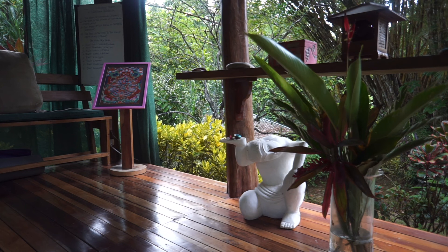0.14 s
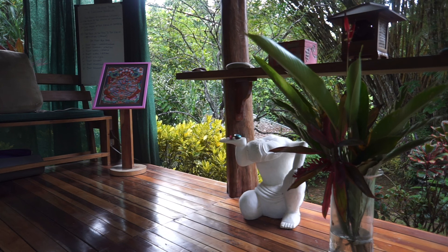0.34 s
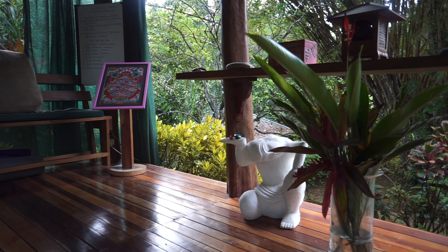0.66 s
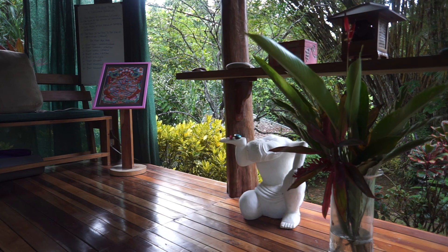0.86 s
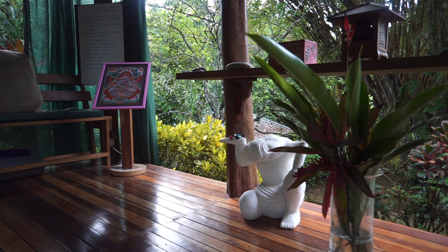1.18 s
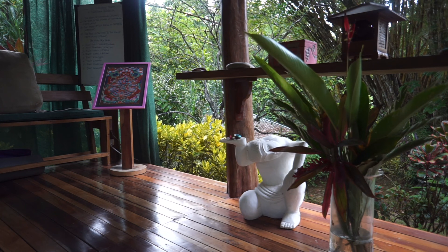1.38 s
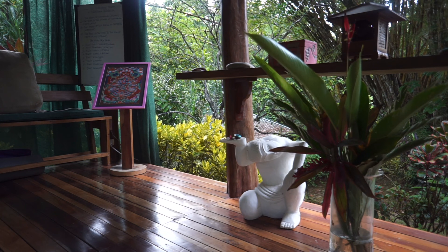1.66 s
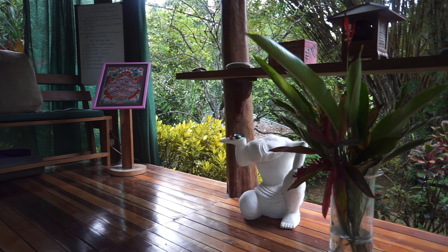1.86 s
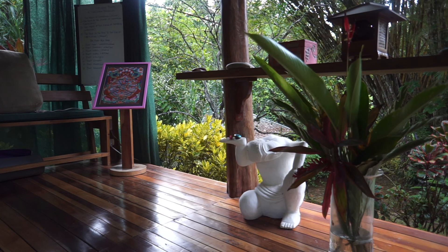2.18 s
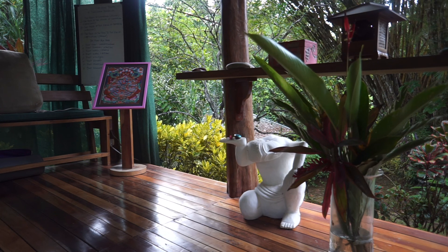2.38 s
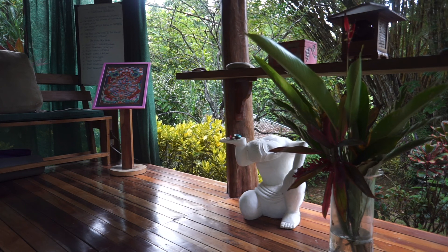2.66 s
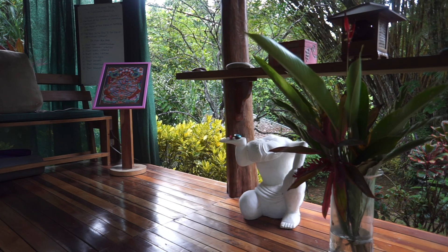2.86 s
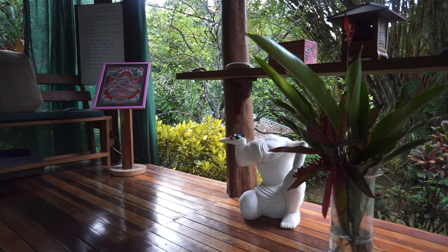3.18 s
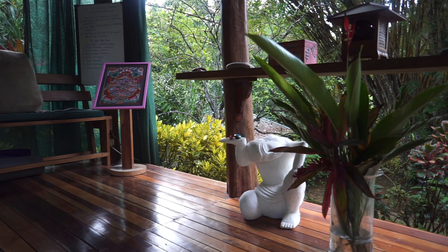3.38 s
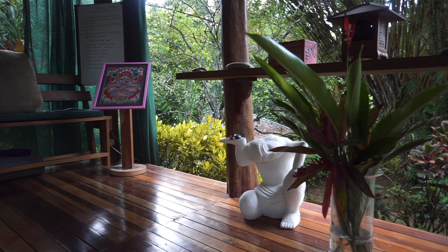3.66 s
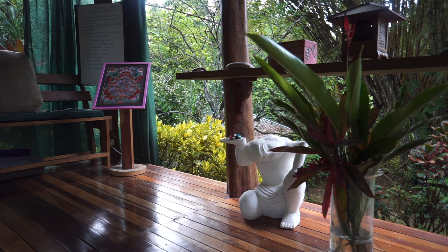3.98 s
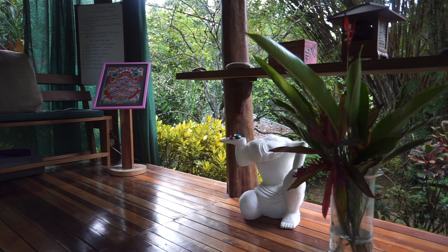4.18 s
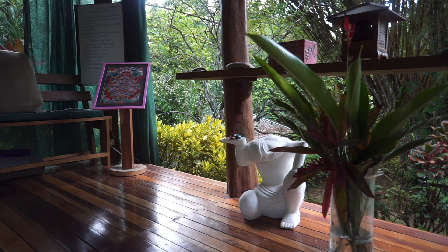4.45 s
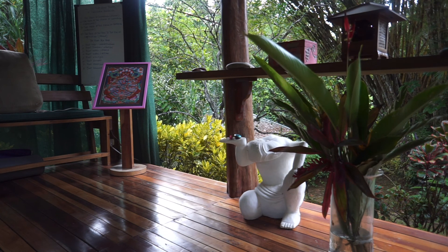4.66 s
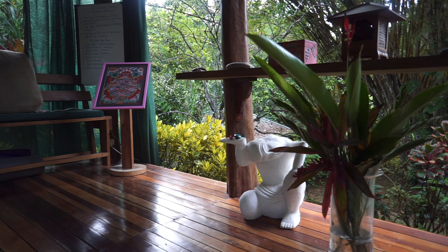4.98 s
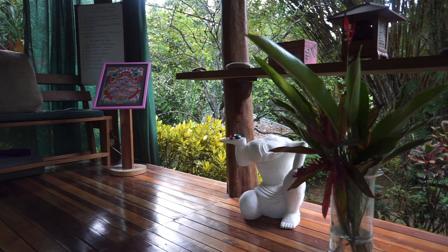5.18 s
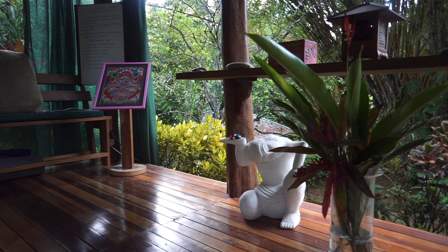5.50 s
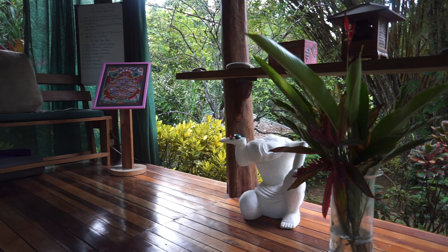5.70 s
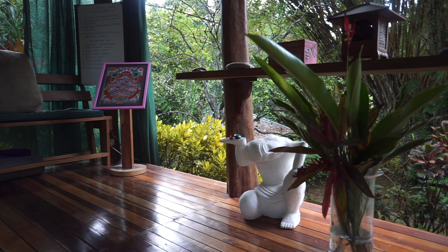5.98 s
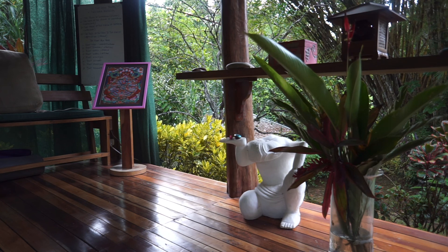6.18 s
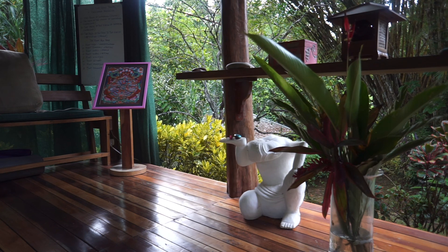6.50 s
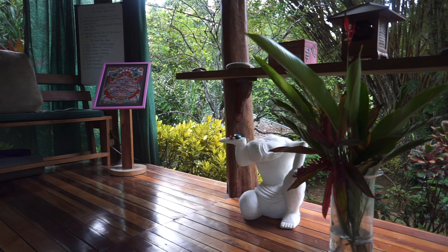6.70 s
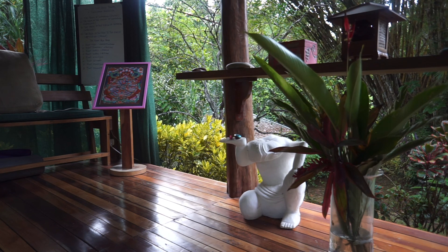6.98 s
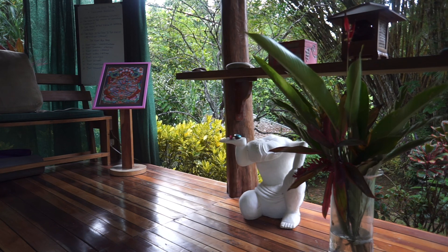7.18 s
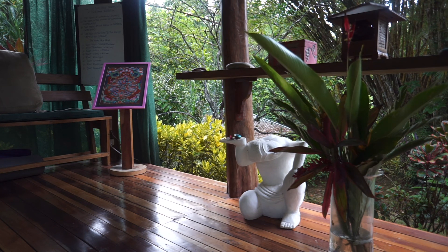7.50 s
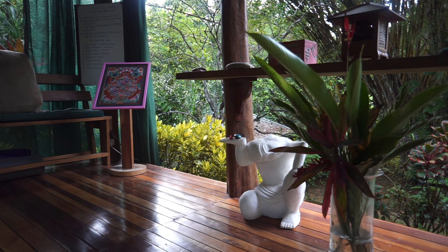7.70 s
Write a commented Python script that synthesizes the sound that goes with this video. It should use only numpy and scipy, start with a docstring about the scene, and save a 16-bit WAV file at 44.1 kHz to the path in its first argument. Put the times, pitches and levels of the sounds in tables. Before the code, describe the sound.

On a quiet jungle veranda, a frog croaks rapidly, wood thumps, then loud rising bird whistles ring among trees over throbbing crickets and faint hum.

```python
"""A quiet veranda at the edge of a tropical forest, over far forest noise, a faint hum and throbbing crickets.
A frog croaks in step at first, over faint chirps; a slower insect joins in with even buzzes of narrow noise.
Small knocks lead to a hollow wooden thump, a struck set of ringing modes; then a bird's gliding sines echo
among the trees. Midway come low rasps, hoarse grunts and squawks, all shaped noise, and puffs of wind.
Clicks and rustles are scattered throughout; late on, wind and rustles mix with the last whistles."""
import sys
import numpy as np
from scipy import signal
from scipy.fft import rfft, irfft
from scipy.io import wavfile

SR = 44100
rng = np.random.default_rng(int(sys.argv[2]) if len(sys.argv) > 2 else 0)


def convert_level_to_amplitude(level_db):
    """Map a level in decibels to its linear amplitude factor."""
    exponent = np.asarray(level_db, float) / 20
    return 10 ** exponent


def wrap_up_sound(samples):
    """Save the sound to the file named by the first command line argument, as 16-bit audio."""
    columns = np.atleast_2d(samples).T
    # keep every value between -1 and 1, then stretch to whole-number steps
    tamed = np.clip(columns, -1, 1)
    steps = np.round(tamed * 32767).astype(np.int16)
    wavfile.write(sys.argv[1], SR, steps)


N = 345734
LEFT_LAG = 4   # samples by which the left port hears later


def rms_one(x):
    """Scale to rms 1."""
    return x / np.sqrt(np.mean(x ** 2) + 1e-20)


def in_time(rows):
    """Columns of a curve table at every sample."""
    s, *columns = np.transpose(rows)
    return [np.interp(np.arange(N) / SR, s, c) for c in columns]


def at_hz(points, hz):
    """Read a spectrum on a log-frequency axis."""
    table_hz, values = np.transpose(points)
    return np.interp(np.log(hz + 1), np.log(table_hz + 1), values)


def drift(rate_hz):
    """Slow random curve of rms 1: low-passed noise, drawn once every 40 samples."""
    r = np.exp(-80 * np.pi * rate_hz / SR)
    noise = rng.standard_normal(N // 40 + 2002)
    slow = signal.lfilter([1], [1, -2 * r, r * r], noise)[2000:]   # skip the filter's start
    return np.interp(np.arange(N) / 40, np.arange(len(slow)), rms_one(slow))


def resonate(x, hz, width_hz):
    """One resonance, gain 1 on top."""
    r = np.exp(-np.pi * width_hz / SR)
    feedback = [1, -2 * r * np.cos(2 * np.pi * hz / SR), r * r]
    return signal.lfilter(np.array([1, 0, -1]) * (1 - r * r) / 2, feedback, x)


def lean(pan_db):
    """Left and right gains that differ by pan_db."""
    return convert_level_to_amplitude(np.array([[pan_db / 2], [-pan_db / 2]]))


def place(x, pan_db):
    """A source reaches the left port a little late."""
    return np.array([np.roll(x, LEFT_LAG), x]) * lean(pan_db)


def trees(x, direct_db, t60, near_db, near_t60, alike):
    """Scatter from near trunks dies fast, from the far forest slowly; partly alike at both ports."""
    t = np.arange(SR) / SR
    shape = convert_level_to_amplitude(-60 * t / t60) + convert_level_to_amplitude(near_db - 60 * t / near_t60)
    both, left, right = rng.standard_normal((3, SR)) * rms_one(shape) / np.sqrt(SR)
    alike = np.clip(alike, 0, 1)
    echo = np.sqrt(alike) * place(both, 0) + np.sqrt(1 - alike) * np.array([left, right])
    scattered = signal.fftconvolve(x[None], echo, axes=1)[:, :N]
    return convert_level_to_amplitude(direct_db) * place(x, -0.19) + scattered


def puffs(rows, apart=0.99):
    """Bursts of coloured noise: (peak_s, level_db, rise_s, t60_s, centre_hz, width_hz, pan_db)."""
    out, t = np.zeros((2, N)), np.arange(SR) / SR
    for s, db, rise, t60, hz, width_hz, pan_db in rows:
        noise = rng.standard_normal((3, SR))
        for _ in range(2):
            noise = resonate(noise, hz, 1.2 * width_hz)
        noise = rms_one(noise)
        swell, fall = np.exp(-2 * (t / rise - 2) ** 2), convert_level_to_amplitude(-60 * (t - 2 * rise) / t60)
        shape = np.where(t < 2 * rise, swell, fall)
        # one noise shared by both ports, and one of its own in each
        burst = convert_level_to_amplitude(db) * shape * (place(noise[0], pan_db) + apart * noise[1:])
        start = int((s - 2 * rise) * SR)
        out[:, start:start + SR] += burst[:, :N - start]
    return out


CUTS = [(3.522, -11.5), (6.073, -1.5)]


def bird():
    """Pure whistles with a slight waver and soft edges; the bird is hidden, so scattered sound outweighs direct."""
    attack_s, release_s = 0.017, 0.0072
    # pitch wobble as a share; notes softer than steady_db wobble more
    wobble, steady_db, wobble_per_db = .0022, -42, .0009
    t, parts = np.arange(N) / SR, np.zeros((len(CUTS) + 1, N + SR))
    waver, flutter = np.resize(drift(30), N + SR), convert_level_to_amplitude(3.02 * drift(91))
    for s, hz, db in notes():
        start = int(s * SR)
        on, age = slice(start, start + len(hz)), np.arange(len(hz)) / SR
        edge = np.clip(np.minimum(age / attack_s, age[::-1] / release_s), 0, 1)
        depth = wobble + wobble_per_db * max(steady_db - db.max(), 0)
        phase = 2 * np.pi * np.cumsum(hz * (1 + depth * waver[on])) / SR
        part = sum(s > cut_s for cut_s, _ in CUTS)
        parts[part, on] += np.sqrt(2) * edge * convert_level_to_amplitude(db) * np.sin(phase)
    heard = [trees(p[:N] * flutter, direct_db=-9, t60=1.0, near_db=3, near_t60=.2, alike=0.64)
             for p in parts]
    # each cut lowers the notes begun since the cut before it, with their echo; later notes are untouched
    for part, (cut_s, remaining_db) in zip(heard, CUTS):
        part *= np.clip((cut_s - t) / 0.0025, convert_level_to_amplitude(remaining_db), 1)
    return sum(heard)


# rising whistles, a straight glide: start_s, rise_s, from_hz, top_hz, level_db (at the best pitch)
GLIDES = [(0.10, 0.26, 2480, 3050, -59), (1.86, 0.097, 2390, 2760, -53.5), (2.065, .09, 1900, 2700, -37),
          (2.224, .08, 2000, 2690, -38), (2.615, .13, 1900, 2950, -38), (2.799, .095, 2196, 2960, -36.5),
          (3.19, 0.16, 2120, 3030, -35.5), (3.38, .095, 2280, 3050, -34), (3.523, .10, 2060, 2750, -35),
          (3.925, 0.15, 1982, 2960, -39), (4.126, .095, 2250, 2950, -34), (4.53, 0.14, 2120, 3020, -35),
          (4.725, 0.099, 2275, 3020, -34), (5.129, .135, 2190, 2990, -36), (5.33, .09, 2370, 3000, -34)]
# held whistles that slide into their pitch: start_s, length_s, from_hz, held_hz, level_db, fade_db
HOLDS = [(1.61, .13, 2000, 2480, -42, 10), (2.925, .26, 1980, 2415, -37, 20),
         (3.685, .14, 2040, 2250, -36, 14), (4.29, .19, 2200, 2520, -35.5, 25),
         (4.915, .12, 2380, 2320, -39, 22), (5.495, 0.19, 2300, 2490, -36.5, 17),
         (5.695, .378, 2200, 2670, -35, 3), (6.075, .075, 2470, 2490, -33, 15),
         (7.2, .19, 1950, 2390, -41, 12), (7.53, .19, 1850, 2090, -40.5, -2),
         (7.71, .13, 2100, 2490, -43, 0.1)]
# short level chirps from further off: start_s, length_s, pitch_hz, level_db
CHIRPS = [(0.01, 0.059, 2150, -53), (1.11, .06, 3800, -64), (1.215, .05, 2320, -52.5),
          (1.27, .05, 3730, -60), (1.315, .045, 2310, -51.5), (1.385, .08, 2770, -55),
          (1.785, .05, 2120, -47), (7.02, .05, 3850, -55)]


def notes():
    """Every whistle as (start s, pitch Hz, level dB), one value a sample."""
    top_s, top_sag_hz, top_fade_db = .04, 60, 11   # a short stay on top of a glide, sagging and dying
    scoop_hz_per_s, scoop_power = 4800, 2.1   # mean speed of the slide; how it rounds into the held pitch
    sag_hz_per_s2 = 1700   # the held pitch then falls ever faster
    chirp_fade_db = 6
    for s, rise, from_hz, top_hz, db in GLIDES:
        t = span(rise + top_s)
        up, top = np.minimum(t / rise, 1), np.maximum(t - rise, 0) / top_s
        hz = from_hz + (top_hz - from_hz) * up - top_sag_hz * top
        yield s, hz, db + carry_db(hz) - top_fade_db * top
    for s, length, from_hz, held_hz, db, fade_db in HOLDS:
        t, rise = span(length), abs(held_hz - from_hz) / scoop_hz_per_s + 1 / SR
        scoop = (held_hz - from_hz) * np.maximum(1 - t / rise, 0) ** scoop_power
        hz = held_hz - scoop - sag_hz_per_s2 * np.maximum(t - rise, 0) ** 2
        yield s, hz, db + carry_db(hz) - fade_db * (t / length) ** 2
    for s, length, hz, db in CHIRPS:
        t = span(length)
        yield s, hz + 0 * t, db - chirp_fade_db * (t / length) ** 2


def span(length):
    """Time axis of a note in seconds."""
    return np.arange(int(length * SR)) / SR


def carry_db(hz):
    """The whistle carries best at one pitch and thins out below and above it."""
    full_hz, low_loss_db_per_khz, high_loss_db_per_khz = 2530, 28, 2.5
    loss = np.maximum(low_loss_db_per_khz * (full_hz - hz), high_loss_db_per_khz * (hz - full_hz))
    return -loss / 1000


# blow on hollow wood and its bounces: start_s, strength_db, contact_hz (lower is softer)
THUMPS = [(1.058, -28, 1140), (1.076, -31, 640), (1.105, -27, 570), (1.154, -42, 740)]
# ringing modes of the wood: pitch_hz, level_db, t60_s
WOOD = [(142, -20, .5), (177.5, -1, 0.62), (199.5, -7, 0.4), (246, -1, 0.25), (270, -7.5, 0.33),
        (306.3, -9.5, 0.33), (450, -19, 0.22), (504, -16.5, 0.15), (730, -8, 0.03), (1200, -23, 0.077)]


def thumps():
    """Soft blows, low-passed clicks, ring the modes of hollow wood; air carries none of the slow push."""
    blows = np.full(N, 1e-18)
    for s, db, contact_hz in THUMPS:
        touch = signal.windows.hann(int(SR / contact_hz))
        blows[int(s * SR):][:len(touch)] = convert_level_to_amplitude(db) * touch / touch.sum()
    # neighbouring modes ring in opposite phase
    body = sum((-1) ** k * convert_level_to_amplitude(db) * ring(blows, hz, t60) for k, (hz, db, t60) in enumerate(WOOD))
    body = signal.sosfilt(signal.butter(2, 90, "high", fs=SR, output="sos"), body)
    echo = trees(body, direct_db=-60, t60=.35, near_db=0, near_t60=.2, alike=.5)
    return place(body, .3) + convert_level_to_amplitude(-16) * echo


def ring(clicks, hz, t60):
    """A unit click sets a decaying sine of height 1 ringing."""
    r, w = convert_level_to_amplitude(-60 / (t60 * SR)), 2 * np.pi * hz / SR
    return signal.lfilter([0, np.sin(w)], [1, -2 * r * np.cos(w), r * r], clicks)


# throat of the frog: centre_hz, width_hz, first_croak_db, last_croak_db, t60_s
FROG = [(1180, 220, -4, -4, .1), (2120, 160, -1, -13, 0.12)]


def frog():
    """Each far croak is a short rough burst in both throat resonances."""
    count, first_s, gap_s, gap_growth_s = 19, .124, .1163, .00042
    level_db, spread_db = -50, 1
    k = np.arange(count)
    times = first_s + gap_s * k + gap_growth_s * k ** 2 / 2
    levels = level_db + spread_db * rng.standard_normal(count)
    rows = []
    for s, db, late in zip(times, levels, k / k[-1]):
        for hz, width, first_db, last_db, t60 in FROG:
            tone_db = first_db + late * (last_db - first_db)
            rows.append((s + .006, db + tone_db, .004, t60, hz, width, 0))
    return puffs(rows, apart=0.6)


# harsh squawks: peak_s, level_db, fall_t60_s
SQUAWKS = [(4.045, -53, .84), (4.09, -50.5, 0.2), (6.084, -54, 0.03), (6.116, -49.5, .5)]
# their throat resonances: centre_hz, width_hz, level_db
THROAT = [(1850, 510, -2.5), (2700, 530, 8), (3050, 97, 0), (3630, 470, 3), (3850, 48, -4),
          (4630, 780, -3.5), (5600, 900, -9.5)]


def squawks():
    """A rough breathy source fills every throat resonance at once."""
    rise_s = .019
    rows = [(s, db + top_db, rise_s, t60, hz, width, 0)
            for s, db, t60 in SQUAWKS for hz, width, top_db in THROAT]
    return puffs(rows) * convert_level_to_amplitude(1.7 * drift(27))


def strikes(rows):
    """Noise bursts that start at once: (start_s, peak_db, centre_hz, width_hz, t60_s)."""
    # noise peaks stand above its mean level, hence 7 dB less
    return puffs([(s + 0.00082, db - 7.0, .0005, t60, hz, width, 0) for s, db, hz, width, t60 in rows])


# small knocks: start_s, peak_db, centre_hz, width_hz, t60_s
KNOCKS = [(0.5703, -38, 3030, 1960, .24), (0.919, -37.5, 2560, 500, 0.11), (4.657, -40.5, 626, 580, 0.2),
          (5.25, -42, 786, 774, 0.19)]


def knocks():
    """Small knocks: instant bursts of band noise that die in a fraction of a second."""
    return strikes(KNOCKS)


# dry clicks in the treble: start_s, peak_db, centre_hz
CLICKS = [(0.293, -38, 7900), (2.9163, -40, 8900), (3.557, -43, 8000), (4.715, -44, 10000),
          (7.1706, -47, 8900)]


def clicks():
    """Dry clicks: instant bursts of wide treble noise, gone within hundredths of a second."""
    width_hz, t60_s = 3600, .03
    return strikes([(s, db, hz, width_hz, t60_s) for s, db, hz in CLICKS])


def grainy(rows):
    """Noise bursts that swell and fade, their level fluttering inside."""
    return puffs(rows) * convert_level_to_amplitude(0.96 * drift(90))


# leafy rustles: peak_s, level_db, rise_s, centre_hz, width_hz
RUSTLES = [(1.301, -59, .06, 4500, 3000), (2.9, -56, .1, 1300, 800), (7.14, -52.5, .035, 2400, 2500),
           (7.43, -54.5, 0.027, 2170, 2400)]


def rustles():
    """Leafy rustles: wide grainy noise that swells and fades, its fall t60 16 times the rise."""
    return grainy([(s, db, rise, 16 * rise, hz, width, 0) for s, db, rise, hz, width in RUSTLES])


# low rasps: peak_s, level_db, t60_s
RASPS = [(3.834, -49, 0.37), (3.889, -47.5, 0.3)]
# their resonances: centre_hz, width_hz, level_db
RASP_BANDS = [(225, 40, -1.1), (612, 123, -1.5)]


def rasps():
    """Low rasps: grainy noise in low resonances."""
    rise_s = .02
    return grainy([(s, db + top_db, rise_s, t60, hz, width, 0)
                   for s, db, t60 in RASPS for hz, width, top_db in RASP_BANDS])


# short hoarse grunts: peak_s, level_db, brightness_db_per_octave
GRUNTS = [(4.025, -54.5, -7), (4.449, -59.5, 2), (5.642, -53, -1.5), (6.256, -53.5, -0.5)]
# their resonances: centre_hz, width_hz, level_db
GRUNT_BANDS = [(1060, 300, -1), (1570, 560, -0.5), (3400, 2600, 2.5)]


def grunts():
    """Hoarse grunts: grainy noise in wide resonances, tilted brighter or darker each time."""
    rise_s, t60_s = .028, 0.3
    rows = []
    for s, db, tilt_db in GRUNTS:
        for hz, width, top_db in GRUNT_BANDS:
            octaves = np.log2(hz / GRUNT_BANDS[0][0])
            rows.append((s, db + top_db + tilt_db * octaves, rise_s, t60_s, hz, width, 0))
    return grainy(rows)


# bands of the crickets: centre_hz, width_hz, pan_db (left over right)
CRICKETS = [(6570, 110, 5), (6870, 46, 7), (8590, 120, 2.5)]
# their levels over time: time_s, first_db, second_db, third_db
CRICKET_DB = [(0.0, -63.5, -64, -58.5), (1.7, -61.5, -60, -60.5), (2.5, -59.5, -69, -63),
              (3.0, -57.5, -57, -59), (3.3, -59.5, -63, -64.5), (4.3, -59.5, -59, -56.5),
              (5.45, -58, -67, -59.5), (5.95, -58, -59, -55), (6.9, -59, -63, -58), (7.84, -58, -60, -56.5)]


def crickets():
    """Many wing strokes blur into narrow noise that throbs."""
    out = 0
    for (hz, width_hz, pan_db), db in zip(CRICKETS, in_time(CRICKET_DB)):
        band = rng.standard_normal((3, N))
        for _ in range(2):
            band = resonate(band, hz, 1.7 * width_hz)
        band = rms_one(place(band[0], pan_db) + 1.08 * band[1:] * lean(pan_db))
        out = out + convert_level_to_amplitude(db + 1.57 * drift(29)) * band
    return out


def buzzes():
    """A slower insect: short narrow noise buzzes at an even pace, about two a second."""
    first_s, gap_s = .45, .468
    return puffs([(s, -68, .05, .5, 6100, 60, 4) for s in np.arange(first_s, N / SR, gap_s)])


# puffs of wind on the microphone: peak_s, level_db
GUSTS = [(4.048, -58), (6.12, -51), (6.319, -52), (6.622, -54), (7.209, -49), (7.528, -51), (7.818, -53)]


def wind():
    """Low lumps of pressure, largely alike at both ports."""
    rise_s, t60_s = .043, 0.38
    return puffs([(s, db, rise_s, t60_s, 50, 70, 0) for s, db in GUSTS], apart=0.41)


# colour of the far forest: pitch_hz, relative_db (per Hz)
FOREST = [(15, -51), (25, -18), (118, -5), (289, -5), (363, -4.5), (392, -5.5), (456, -7.5), (1260, -13.5),
          (1760, -15.5), (2220, -15.5), (5400, -20.5), (6630, -18.5), (7720, -22), (8550, -22),
          (11000, -24.5), (14300, -119), (22000, -120)]
# its level over time: time_s, level_db, far_calls_db (extra near 2 kHz)
SWELL = [(0, -50, 6), (1, -49.5, 7), (2, -51, 9), (3, -50, 6.5), (4.2, -49, 6), (5.2, -50, 5.5),
         (6.3, -49, 6.5), (6.8, -50, 3), (7.84, -49.5, 5.5)]
# how alike left and right are: pitch_hz, likeness (share; below 0 counts as 0)
LIKENESS = [(60, 1), (130, 0.71), (260, 0.57), (550, 0.012), (1150, -0.078), (2410, 0.48), (5050, -0.55),
            (10600, 0.25)]
# its lean to one side: pitch_hz, pan_db (left over right)
LEAN = [(60, -0.5), (170, 0.5), (470, -0.5), (1340, 0.0), (3760, 0.5), (10600, 1)]


def forest():
    """Far noise with its colour, left-right likeness and lean set per frequency."""
    level_db, far_db = in_time(SWELL)
    hz = np.fft.rfftfreq(N + 2, 1 / SR)
    both, left, right = rfft(rng.standard_normal((3, N + 2)))
    alike = np.clip(at_hz(LIKENESS, hz), 0, 1)
    late = np.exp(-2j * np.pi * hz * LEFT_LAG / SR)
    shared = both * np.array([late, late ** 0])
    pair = np.sqrt(alike) * shared + np.sqrt(1 - alike) * np.array([left, right])
    pair = pair * convert_level_to_amplitude(at_hz(FOREST, hz) + at_hz(LEAN, hz) * np.array([[.5], [-.5]]))
    noise = rms_one(irfft(pair, N + 2)[:, :N])
    # far calls come and go around 2 kHz, the treble flickers
    calls = resonate(noise, 2250, 1100) * (convert_level_to_amplitude(far_db + 1.2 * drift(1.36)) - 1)
    treble = resonate(noise, 8900, 4900) * (convert_level_to_amplitude(1.2 * drift(13)) - 1)
    return convert_level_to_amplitude(level_db) * (noise + calls + treble)


# faint low tones: pitch_hz, level_db (rms, before the waver)
HUM = [(119, -66), (359.5, -64.5)]


def hum():
    """Faint low sines whose level wavers."""
    t = np.arange(N) / SR
    return sum(np.sqrt(2) * convert_level_to_amplitude(db + 1.3 * drift(10.0)) * np.sin(2 * np.pi * hz * t) for hz, db in HUM)


def scene():
    """All sources together."""
    animals = bird() + frog() + squawks() + rasps() + grunts() + crickets() + buzzes()
    small_sounds = thumps() + knocks() + clicks() + rustles()
    return animals + small_sounds + wind() + forest() + hum()


def low_pass(x):
    """Removes everything above the highest recorded frequency."""
    return signal.sosfilt(signal.butter(12, 11060, fs=SR, output="sos"), x)


def record(dry):
    """The finished mix goes to its final form."""
    return low_pass(dry)


dry = scene()
out = record(dry)
wrap_up_sound(out)
```